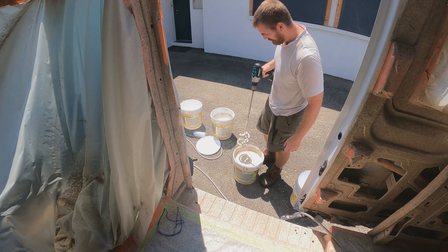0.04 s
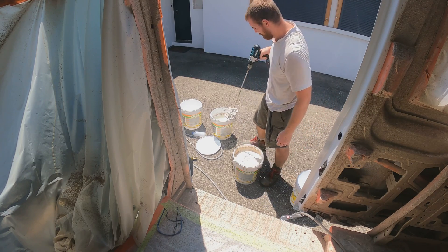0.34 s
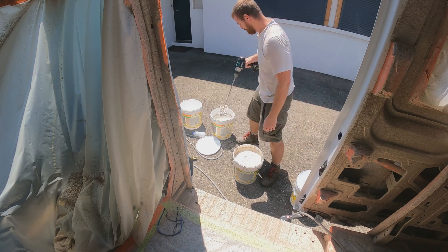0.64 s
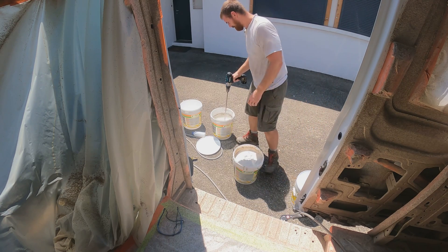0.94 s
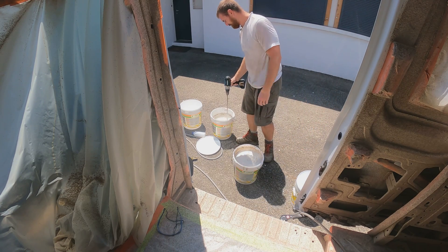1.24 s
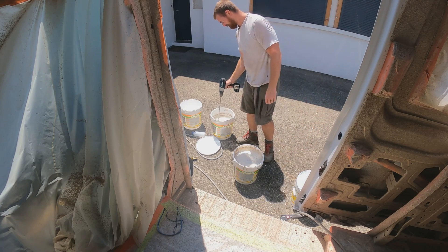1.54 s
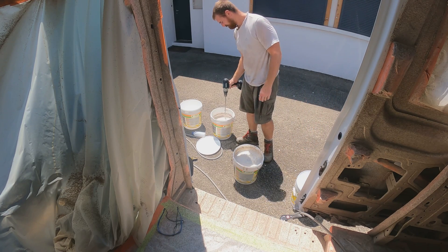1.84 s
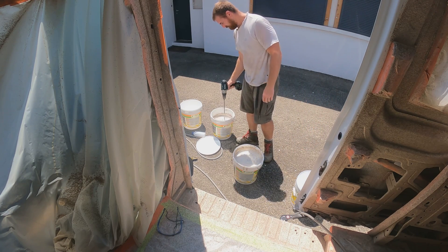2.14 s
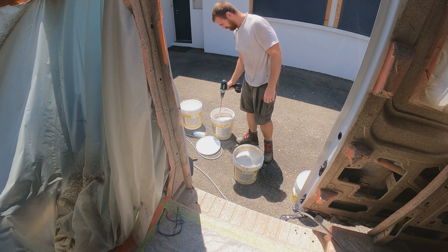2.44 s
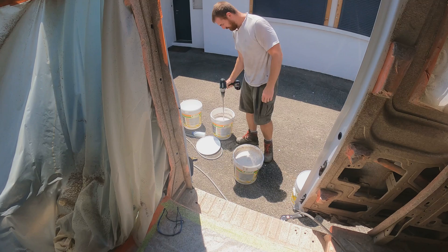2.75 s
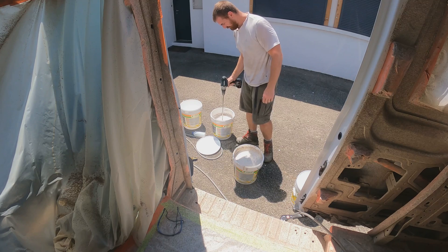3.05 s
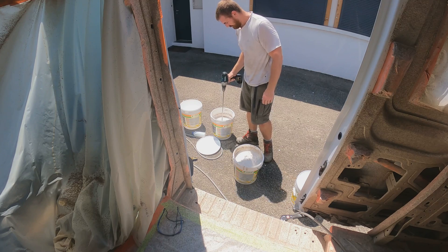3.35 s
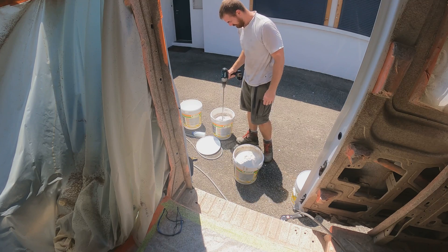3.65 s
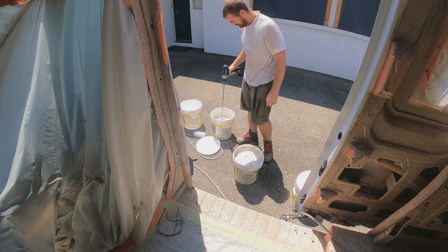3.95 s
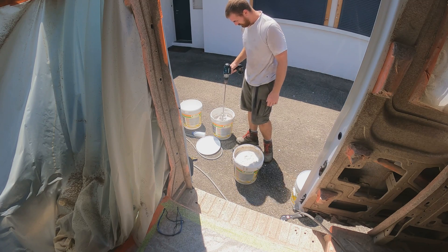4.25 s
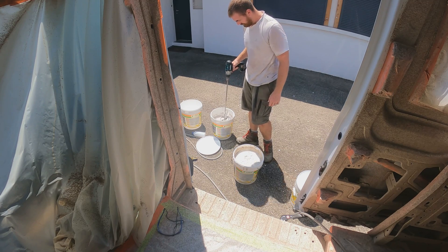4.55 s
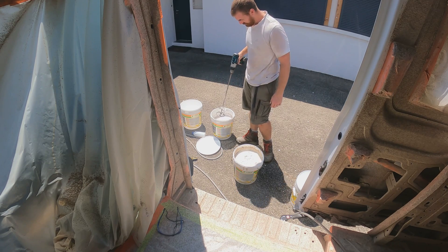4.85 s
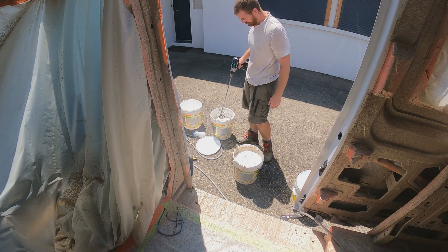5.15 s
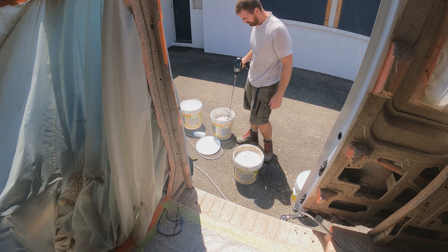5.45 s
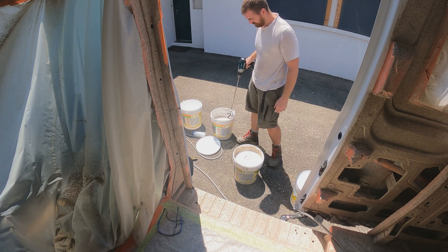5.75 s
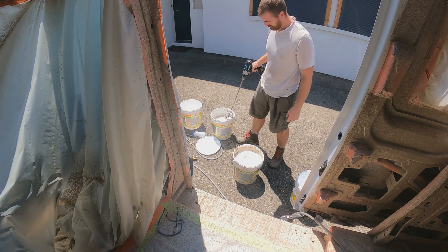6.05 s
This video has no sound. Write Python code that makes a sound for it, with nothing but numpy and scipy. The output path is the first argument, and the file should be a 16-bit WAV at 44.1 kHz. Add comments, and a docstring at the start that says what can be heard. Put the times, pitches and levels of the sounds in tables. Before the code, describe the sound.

A cordless drill whines in bursts, spinning a mixing paddle in a bucket of churning water outdoors, followed by three hard knocks.

```python
"""A yard between a van and a house wall, on a stereo microphone; light wind and far traffic throughout.
A mixing paddle clatters into a bucket of water, a little to the right, and something clinks far off.
A cordless drill spins the paddle clean: the gears whine through four pulls of the trigger while the
water churns, gulps and is flung about. As the last drips fall, three hard knocks, like a hammer on
wood, ring round the yard."""
import sys
import numpy as np
from scipy import signal
from scipy.io import wavfile
from scipy.ndimage import uniform_filter1d, map_coordinates

SR = 44100
rng = np.random.default_rng(int(sys.argv[2]) if len(sys.argv) > 2 else 0)


def waveform_to_disk(signal):
    """Save audio, clipped to [-1, 1], as 16-bit WAV at the path in sys.argv[1]."""
    frames = np.transpose(np.atleast_2d(signal))
    scaled = np.clip(frames, -1, 1) * 32767
    samples = np.round(scaled).astype(np.int16)
    wavfile.write(sys.argv[1], SR, samples)


N = 278257

# spectrum of a hit on the bucket, by paddle or water: f/Hz, relative level/dB
BUCKET_SPECTRUM = [(150, -52), (350, -14), (900, 2), (1600, 5), (3000, 9.5), (6000, 3), (8500, -11.5),
                   (12000, -21), (15000, -40)]
EDGES_HZ = np.geomspace(18, 16000, 30)
# third-octave bands: centre f/Hz, band-pass filter
BANDS = [(np.sqrt(lo * hi), signal.butter(2, [lo, hi], "band", fs=SR, output="sos"))
         for lo, hi in zip(EDGES_HZ, EDGES_HZ[1:])]


def from_db(db):
    """Decibels to gain."""
    return 10 ** (np.asarray(db) / 20)


def rms_one(x):
    """Scale to rms 1."""
    return x / np.sqrt(np.mean(x ** 2) + 1e-20)


def at_hz(points, hz):
    """Read a curve on a log-frequency axis."""
    freqs, values = np.transpose(points)
    return np.interp(np.log(hz), np.log(freqs), values)


def drift(rate_hz):
    """A smooth random wander with a spread of about 1."""
    pole = np.exp(-2 * np.pi * rate_hz * 20 / SR)   # one step every 20 samples
    slow = signal.lfilter([1], [1, -2 * pole, pole * pole], rng.standard_normal(N // 20 + 4002))[4000:]
    return np.interp(np.arange(N) / 20, np.arange(len(slow)), rms_one(slow))


def swell(crest_s, rise_s, t60):
    """An envelope that rises smoothly to 1 at its crest and then dies away."""
    t = np.arange(N) / SR - crest_s
    return np.exp(-(np.minimum(t, 0) / rise_s) ** 2) * from_db(-60 * np.maximum(t, 0) / t60)


def add(out, s, sound):
    """Lay a sound into a track at s seconds."""
    i = max(0, round(s * SR))
    out[..., i:i + sound.shape[-1]] += sound[..., :N - i]


def ring(clicks, hz, t60):
    """A unit click sets off a decaying sine of height 1."""
    r, w = from_db(-60 / (t60 * SR)), 2 * np.pi * hz / SR
    return signal.lfilter([0, np.sin(w)], [1, -2 * r * np.cos(w), r * r], clicks + 1e-18)


def colour(x, spectrum):
    """Causal third-octave equaliser; alternating signs keep neighbouring bands in step."""
    return sum((-1) ** k * from_db(at_hz(spectrum, hz)) * signal.sosfilt(sos, x)
               for k, (hz, sos) in enumerate(BANDS) if hz > spectrum[0][0] / np.sqrt(2))


def noise_bands(size, low_hz, high_hz):
    """Third-octave bands of stereo noise, left and right least alike in the midrange."""
    # likeness of the microphone's two sides: f/Hz, correlation
    likeness = [(30, 1), (150, 0.85), (600, 0.72), (1500, 0.63), (4000, 0.65), (8000, 1), (13000, 1)]
    white = rng.standard_normal((2, 2, size))
    for k, (hz, sos) in enumerate(BANDS):
        if low_hz <= hz <= high_hz:
            mid, side = signal.sosfilt(sos, white[k % 2])
            alike = at_hz(likeness, hz)
            yield hz, np.sqrt(1 + alike) * mid + np.sqrt(1 - alike) * np.array([side, -side])


def noise(spectrum, patchy_db):
    """Coloured stereo noise whose bands flicker on their own; rms 1."""
    return rms_one(sum(band * from_db(at_hz(spectrum, hz) + patchy_db * drift(14))
                       for hz, band in noise_bands(N, spectrum[0][0], spectrum[-1][0])))


def yard(x, wet_db, dull_hz):
    """The microphone hears the direct sound, a few wall echoes and a scattered tail that dies by band."""
    # decay of the yard: f/Hz, t60/s
    decay = [(100, 0.7), (400, .5), (1000, 0.4541), (2500, 0.41), (6000, 0.34), (14000, 0.88)]
    # echoes off the walls: delay/s, relative level/dB
    echoes = [(0.012, -19.5), (0.031, -37), (.075, -14)]
    t = np.arange(SR * 3 // 4) / SR
    tail = sum(band * from_db(-60 * t / at_hz(decay, hz))
               for hz, band in noise_bands(len(t), EDGES_HZ[2], EDGES_HZ[-1]))
    tail = rms_one(tail * (1 - np.exp(-t / 0.0085))) / np.sqrt(len(t))
    for delay, db in echoes:
        tail[:, round(delay * SR)] += from_db(db)
    pole = np.exp(-2 * np.pi * dull_hz / SR)
    response = from_db(wet_db) * signal.lfilter([1 - pole], [1, -pole], tail)
    response[:, 0] += 1   # the direct path
    return signal.fftconvolve(x[None], response, axes=1)[:, :N]


def blows(rows, spectrum, contact_s, chatter, usual_hz, tilt_db):
    """Each blow is a click and a brief chatter, brighter if its centre lies above usual_hz."""
    out, t = np.zeros(N), np.arange(SR // 20) / SR
    for s, db, centre_hz in rows:
        db_per_octave = tilt_db * np.log2(centre_hz / usual_hz)
        tilted = [(hz, level + db_per_octave * np.log2(hz / usual_hz)) for hz, level in spectrum]
        force = chatter * rng.standard_normal(len(t)) * np.exp(-t / contact_s)
        force[0] = 1
        crack = colour(force, tilted)
        add(out, s, from_db(db) * crack / np.abs(crack).max())
    return out


def open_air():
    """Wind rumble, far traffic, and a faint rustle while the paddle is carried and drains."""
    # spectra of the three: f/Hz, relative level/dB
    wind_spectrum = [(18, 0.5), (30, 2), (42, 5.5), (60, -5.5), (100, -16), (200, -50)]
    traffic_spectrum = [(35, -39), (60, -20.5), (174, 2.5), (219, 1), (491, -6), (526, -5.5), (744, -25),
                        (798, -35), (1180, -31), (2840, -84), (3580, -41), (7160, -39.5), (15000, -78)]
    rustle_spectrum = [(700, 4), (1200, 8), (2200, 1.5), (3500, -4), (6000, -4.5), (8000, -13.5),
                       (11000, -33.5), (15000, -34)]
    # swells of wind and of rustle: crest t/s, rise/s, t60/s, level/dB
    gusts = [(0.2, .3, 2.7, -58), (3.35, 0.46, 4, -60.5), (4.3, 0.35, 2.7, -53.5), (4.659, .06, 0.37, -45),
             (5.6, 0.7, 8, -58.5)]
    rustles = [(0.18, 0.067, 1.6, -63), (0.85, 0.18, 1.0, -56.5), (5.17, 0.18, 2.1, -66)]
    blowing = from_db(-58.5) + sum(from_db(db) * swell(*shape) for *shape, db in gusts)
    rustling = from_db(-67.5) + sum(from_db(db) * swell(*shape) for *shape, db in rustles)
    traffic = from_db(-54.5) * noise(traffic_spectrum, patchy_db=2.0)
    wind = blowing * from_db(1.5 * drift(7.9)) * noise(wind_spectrum, patchy_db=1.0)
    rustle = rustling * noise(rustle_spectrum, patchy_db=-0.5) * from_db(2.4 * drift(120))
    return wind + traffic + rustle


def clacks():
    """The steel paddle hits the plastic bucket."""
    # paddle hits: t/s, dry peak level/dB, centre f/Hz
    hits = [(0.134, -48, 2710), (0.184, -40.5, 4270), (0.588, -42, 2190), (0.787, -38, 3830),
            (0.944, -17.5, 5560), (0.971, -29, 1390), (1.028, -20, 2130), (1.067, -19, 1450),
            (1.105, -30, 2900), (3.184, -11, 2300), (3.191, -14.5, 2000), (3.226, -12.5, 1420),
            (3.617, -17, 3000), (3.698, -12.5, 2880), (3.743, -17.5, 1110), (4.135, -24.5, 2870),
            (4.353, -11.5, 3400), (4.359, -12.5, 3320), (4.463, -19, 2000)]
    clatter = blows(hits, BUCKET_SPECTRUM, contact_s=0.0036, chatter=0.84, usual_hz=3000, tilt_db=3.0)
    return yard(clatter, wet_db=-3.0, dull_hz=6700)


def clink(at_s=.238):
    """Something small rings once, far off, its onset blurred by distance."""
    # its modes: f/Hz, level/dB, t60/s (the swell shortens them further)
    modes = [(1116, -41.5, 0.27), (1210, -50, 0.3), (804, -57.5, 0.78), (2340, -61, 0.38), (3020, -58, .14)]
    click = np.zeros(N)
    click[round(at_s * SR)] = 1
    rings = sum(from_db(db) * ring(click, hz, t60) for hz, db, t60 in modes)
    return yard(rings * swell(at_s + .018, rise_s=.017, t60=1.2), wet_db=-8, dull_hz=3000)


def bubbles(per_s, cycles, spread_db, pitch_count=36):
    """Bubbles of all sizes are born in clumps and ring for some cycles; rms 1."""
    # strength by bubble pitch: f/Hz, relative level/dB
    spectrum = [(200, -42), (330, -2.5), (500, 6.5), (800, 4.5), (1400, 3), (2200, -2), (4000, -33.5)]
    strengths = from_db(spread_db * np.minimum(rng.exponential(1, N), 4)) * rng.choice([-1, 1], N)
    births = strengths * (rng.random(N) < per_s * from_db(3 * drift(15)) / SR)
    pitch_index = rng.integers(0, pitch_count, N)
    pitches = np.geomspace(spectrum[0][0], spectrum[-1][0], pitch_count)
    return rms_one(sum(from_db(at_hz(spectrum, hz)) * hz * ring(births * (pitch_index == k), hz, cycles / hz)
                       for k, hz in enumerate(pitches)))


def gulps():
    """Big air pockets close in the vortex, each ringing with a rising pitch."""
    # air pockets: t/s, level/dB, starting f/Hz, t60/s
    pockets = [(0.946, -27, 844, 0.075), (1.066, -21, 292, 0.036), (1.069, -38, 194, 0.13),
               (1.107, -18.5, 2840, 0.034), (1.125, -31.5, 1342, .12), (1.25, -30.5, 306, 0.15),
               (1.3, -32, 622, .08), (3.162, -12, 680, 0.016), (3.612, -27, 495, .1),
               (3.635, -23.5, 692, 0.11), (3.672, -19, 694, 0.089), (3.70, -24.5, 456, 0.16),
               (3.71, -20.5, 781, 0.14), (3.742, -12.5, 805, 0.057), (3.755, -25, 488, 0.098),
               (3.898, -26, 1220, 0.048), (4.331, -18, 595, 0.03), (4.368, -22, 752, 0.18),
               (4.395, -21.5, 812, 0.093)]
    out, t = np.zeros(N), np.arange(SR // 4) / SR
    for s, db, hz, t60 in pockets:
        envelope = (1 - np.exp(-t / 0.0036)) * from_db(db - 60 * t / t60)
        add(out, s, envelope * np.sin(2 * np.pi * hz * (t + 0.067 * t * t / t60)))
    return yard(out, wet_db=-8.0, dull_hz=4000)


def water(speed):
    """The paddle churns up bubbles and throws a fine spray, both growing with its speed."""
    # heaves as the paddle goes in, starts, slows or lifts: crest t/s, rise/s, t60/s, churn/dB, spray/dB
    sloshes = [(0.95, 0.011, 1.4, -50, -38.5), (1.07, 0.064, 0.82, -44, -43), (1.32, 0.11, 0.38, -38, -49),
               (3.22, 0.049, 0.2, -38.5, -34), (3.63, 0.044, 0.33, -36.5, -51),
               (3.72, 0.061, 0.5, -30, -33), (3.89, 0.044, 1.13, -48.5, -45.5),
               (4.164, 0.0081, 0.24, -39.5, -68), (4.36, 0.054, 0.17, -54, -31),
               (4.47, .012, 0.22, -60, -34.5)]
    # fine spray: f/Hz, relative level/dB
    spray_spectrum = [(530, 3), (900, -10), (1050, 10.5), (1310, 12.5), (2340, -3), (3830, 8), (6350, -1),
                      (12000, -20), (15000, -64)]
    churning, spraying = from_db(-48) * speed ** 2, from_db(-44) * speed ** 2
    for crest_s, rise_s, t60, churn_db, spray_db in sloshes:
        heave = swell(crest_s, rise_s, t60)
        churning = np.hypot(churning, from_db(churn_db) * heave)
        spraying = np.hypot(spraying, from_db(spray_db) * heave)
    churn = churning * bubbles(per_s=1200, cycles=34, spread_db=3.0)
    churn = signal.sosfilt(signal.butter(4, 220, "high", fs=SR, output="sos"), churn)
    spray = spraying * rms_one(noise(spray_spectrum, patchy_db=3.0) * from_db(3.4 * drift(130)))
    return yard(churn, wet_db=-6.0, dull_hz=4000) + spray


def splats():
    """Flung water lands in the bucket and on the ground, a longer, softer contact than the paddle's; the last
    row is instead a light rebound just after the second knock."""
    # water landings, then a light rebound after the second knock: t/s, dry peak level/dB, centre f/Hz
    soft_hits = [(1.243, -30, 960), (1.298, -24.5, 1180), (3.877, -27, 1750), (3.898, -30, 1300),
                 (3.929, -22.5, 1290), (4.003, -29.5, 1210), (4.082, -33, 2400), (4.16, -27.5, 1710),
                 (4.68, -39, 1690), (4.955, -40, 3550), (5.199, -40.5, 1700), (5.211, -37.5, 1500),
                 (5.803, -42, 1650), (5.987, -29, 1270)]
    patter = blows(soft_hits, BUCKET_SPECTRUM, contact_s=0.0058, chatter=0.95, usual_hz=3000, tilt_db=3.5)
    return yard(patter, wet_db=-0.5, dull_hz=6050)


def trigger(spin_up_s=.3, kick_s=.012, freewheel_per_s=5.6):
    """Pulls spin the motor up, releases let it run down; gives share of top speed, tone dB, octave dB."""
    # pulls: pressed t/s, full speed due t/s, released t/s, slowing/(share per s), tone/dB, octave/dB
    pulls = [(1.292, 1.497, 1.535, 1.5, .5, -2), (1.6, 1.752, 3.16, 6, 1.5, -.7),
             (3.22, 3.412, 3.66, 3.2, -4.5, -.5), (4.175, 4.368, 4.33, 4.6, 0, -2)]
    t, runs = np.arange(N) / SR, []
    for pressed, full, released, slowing, tone_db, octave_db in pulls:
        rise = 1 - (np.maximum(full - np.minimum(t, released), 0) / spin_up_s) ** 2
        kick = np.clip((t - pressed) / kick_s, 0, 1)
        speed = np.clip(rise - slowing * np.maximum(t - released, 0), 0, 1) * kick
        # slowing fast, the teeth lose their load and sing less
        unloaded_db = 20 * np.log10(1 + (slowing / freewheel_per_s) ** 4) * (t > released)
        runs.append([speed, tone_db - unloaded_db, octave_db - unloaded_db])
    runs = np.array(runs)
    fastest = np.argmax(runs[:, 0], axis=0)
    speed, *levels = runs[fastest, :, np.arange(N)].T
    return speed, *uniform_filter1d(levels, size=800)


def mesh_rate(speed, usual_hz=3015, settle_s=.1):
    """Gear teeth meeting per second: the share of top speed times what the water's drag allows."""
    # top speed sagging and recovering with the drag: t/s, mesh f/Hz
    top = [(1.8, 3014), (1.9, 2982), (2.0, 3005), (2.08, 2980), (2.15, 3015), (2.25, 3000), (2.42, 2946),
           (2.54, 3034), (2.72, 3000), (2.8, 3015), (2.9, 3064), (3.03, 3020), (3.16, 3060)]
    times, top_hz = np.transpose([(top[0][0] - settle_s, usual_hz), *top, (top[-1][0] + settle_s, usual_hz)])
    return np.maximum(speed * np.interp(np.arange(N) / SR, times, top_hz), 1)


def drill(speed, tone_db, octave_db, teeth=10):
    """Gears sing at the mesh rate and its octave among motor orders and a rattle; all grow with speed."""
    # how strongly the gearbox sings the mesh tone and its octave: f/Hz, level/dB
    mesh_response = [(2250, -58), (2560, -37), (2800, -29), (2950, -35), (3005, -34), (3030, -31),
                     (3060, -30.5)]
    octave_response = [(4900, -60), (5550, -41), (5890, -32), (5990, -36), (6050, -35), (6120, -37)]
    # weaker lines of motor and gearbox: multiple of the motor speed, relative level/dB
    orders = [(1, -24), (3, -20), (4, -20), (5, -23), (7, -21), (9, -18), (9.5, -16), (10.5, -17),
              (11, -21), (12, -19), (13, -17.5), (14, -26), (15, -17), (21, -23), (30, -30)]
    # housing resonances that lift an order sweeping through: f/Hz, half-width/Hz, lift/dB
    housing = [(2100, 110, 5), (2950, 250, 4), (4050, 110, 15)]
    # gear rattle and fan air: f/Hz, relative level/dB
    rattle_spectrum = [(130, -22), (200, -60.5), (320, -12), (430, -16.5), (600, -14.5), (1150, -4),
                       (1800, -5), (2400, -1), (3000, 2), (3700, 5), (4900, -6), (6500, 7), (8200, -25.5),
                       (10000, -9), (12500, -33.5), (15000, -61)]
    mesh_hz = mesh_rate(speed)
    effort = from_db(11.5 * np.log2(speed + 1e-6))   # 11.5 dB per doubling of speed
    waver = .0013 * drift(30) + .0008 * drift(6)   # the churning load unsteadies the speed
    turn = 2 * np.pi * np.cumsum(mesh_hz * (1 + waver)) / (SR * teeth)
    strain = np.clip(10 * (1 - speed), 0, 1)   # the tones are rougher below top speed
    mesh = from_db((2.5 + 1.8 * strain) * drift(70) + .7 * drift(12))
    mesh *= np.sin(teeth * turn + (.28 + .17 * strain) * drift(150))
    octave = from_db(1.8 * drift(60) + 2 * drift(12))
    octave *= np.sin(2 * teeth * turn + (.27 + .15 * strain) * drift(150))
    whine = from_db(tone_db + at_hz(mesh_response, mesh_hz)) * mesh
    whine += from_db(octave_db + at_hz(octave_response, 2 * mesh_hz)) * octave
    for multiple, db in orders:
        order_hz = multiple * mesh_hz / teeth
        lift_db = sum(peak_db / (1 + ((order_hz - hz) / width) ** 2) for hz, width, peak_db in housing)
        whine += from_db(db - 33 + lift_db + 2.5 * drift(10)) * np.sin(multiple * turn + .6 * drift(30))
    whine = yard(np.sqrt(2) * whine * effort, wet_db=-11, dull_hz=7000)
    # the rattle swells once a motor turn and shakes with the paddle
    shake = rms_one((1 + 0.076 * np.sin(turn)) * from_db(drift(83)))
    return whine + from_db(-30) * effort * shake * noise(rattle_spectrum, patchy_db=1.0)


def knocks():
    """Hard blows out of sight: a dry snap, then most of the sound reaches the microphone off the walls."""
    # three knocks and a light rebound: t/s, level/dB, centre f/Hz, snap against that level/dB
    strikes = [(5.542, -16, 1320, -2.5), (5.875, -13.5, 910, -3), (6.153, -16, 1460, 0.5),
               (6.228, -32.5, 1110, 3.5)]
    # spectrum of a knock: f/Hz, relative level/dB
    spectrum = [(60, -14), (140, -6), (240, -14.5), (330, -1), (520, -7), (900, -3), (1500, 1),
                (2200, -5.5), (3200, -11.5), (5500, -13.5), (8000, -21.5), (11000, -40), (15000, -40)]
    # modes of the struck thing: f/Hz, relative level/dB, t60/s
    modes = [(334, -31, .42), (834, -27, .5), (910, -29, .4), (1007, -30, .35), (1593, -29, .3),
             (2083, -31, .3), (5647, -47, .8)]
    clicks = np.zeros(N)
    for s, db, _, _ in strikes:
        clicks[round(s * SR)] = from_db(db)
    rings = sum(from_db(db + 6.5) * ring(clicks, hz, t60) for hz, db, t60 in modes)
    contacts = [(s, db - 2, centre_hz) for s, db, centre_hz, _ in strikes]
    cracks = blows(contacts, spectrum, contact_s=0.0029, chatter=0.11, usual_hz=1540, tilt_db=0.5)
    # the force peaks a moment after the first contact
    peaks = [(s + .0025, db + snap_db, centre_hz) for s, db, centre_hz, snap_db in strikes]
    snaps = blows(peaks, spectrum, contact_s=0.0013, chatter=1.0, usual_hz=1500, tilt_db=-4.0)
    return yard(cracks, wet_db=9.5, dull_hz=4300) + snaps + rings


def scene():
    """All stands slightly right of the microphone, so the left side hears it a moment later."""
    speed, tone_db, octave_db = trigger()
    rinsing = drill(speed, tone_db, octave_db) + water(speed) + gulps() + clacks() + splats()
    left, right = rinsing + knocks() + clink() + open_air()
    left = map_coordinates(left, [np.arange(N) - .62], order=3, mode="nearest")   # 0.62 samples late
    return np.array([left * from_db(-0.95), right * from_db(-0.55)])


def record(dry):
    """The top is cut steeply above 15.3 kHz."""
    return signal.sosfilt(signal.ellip(10, .1, 80, 15300, fs=SR, output="sos"), dry)


dry = scene()
out = record(dry)
waveform_to_disk(out)
```